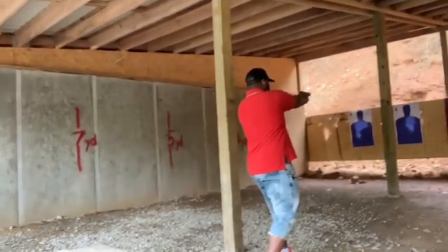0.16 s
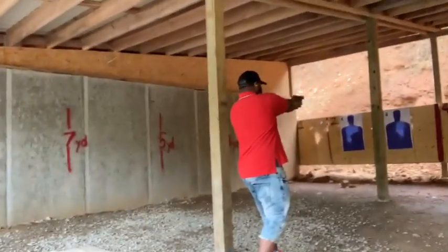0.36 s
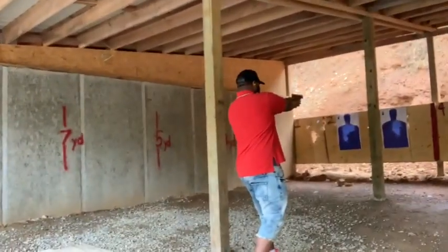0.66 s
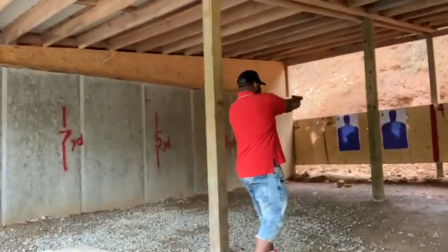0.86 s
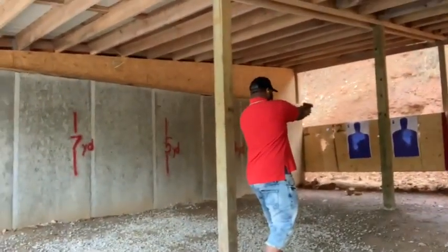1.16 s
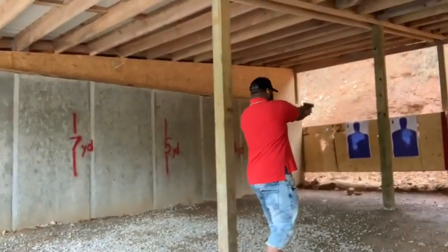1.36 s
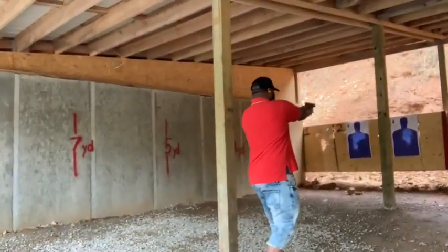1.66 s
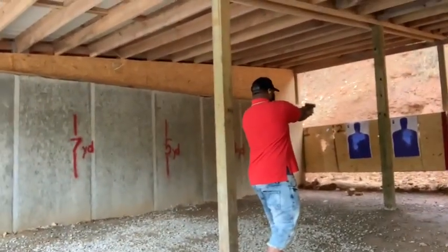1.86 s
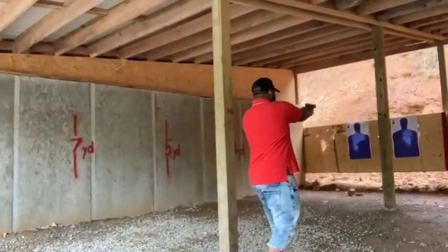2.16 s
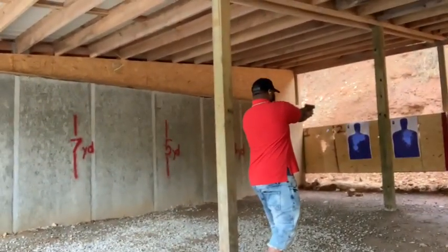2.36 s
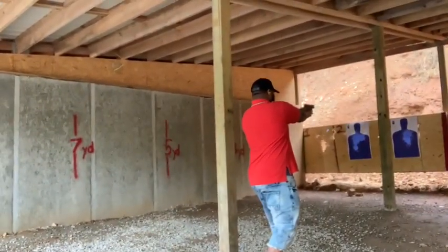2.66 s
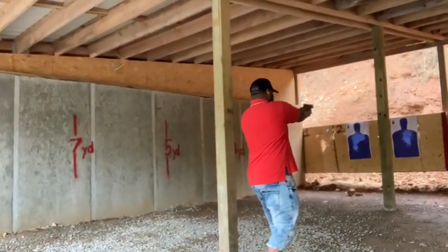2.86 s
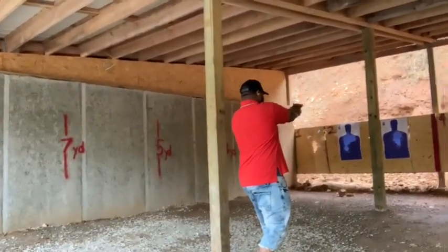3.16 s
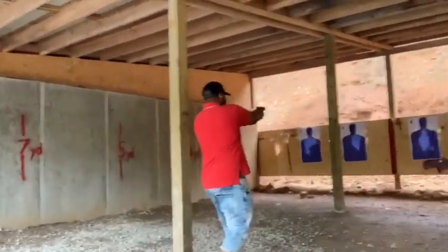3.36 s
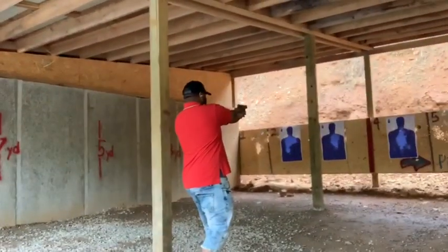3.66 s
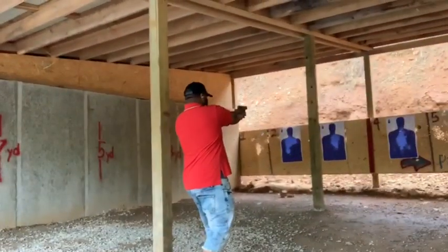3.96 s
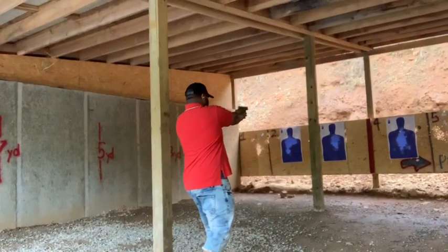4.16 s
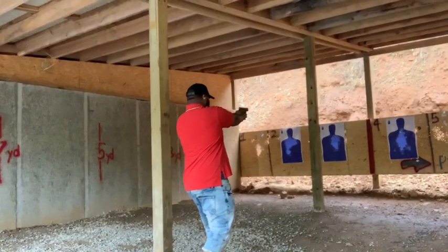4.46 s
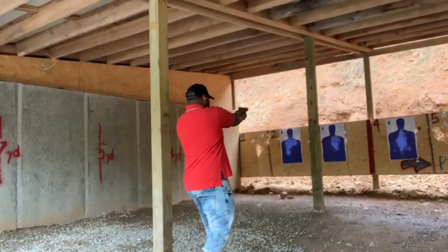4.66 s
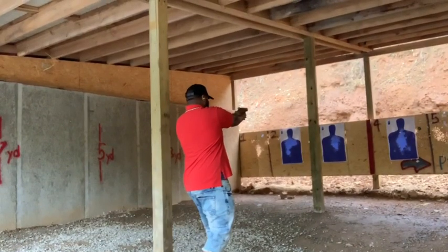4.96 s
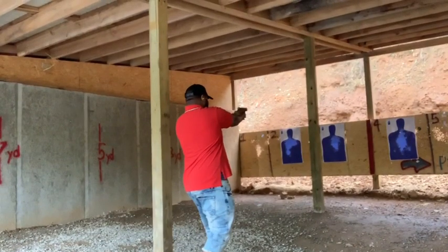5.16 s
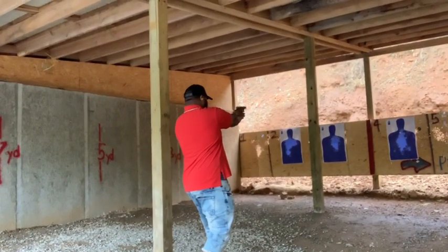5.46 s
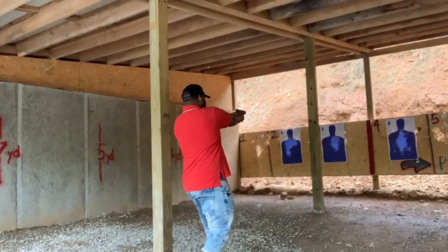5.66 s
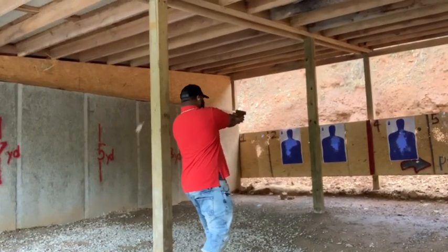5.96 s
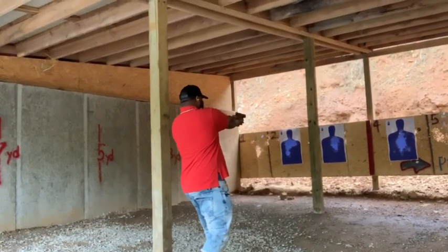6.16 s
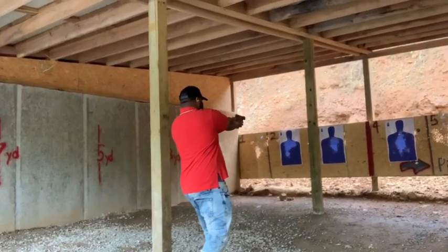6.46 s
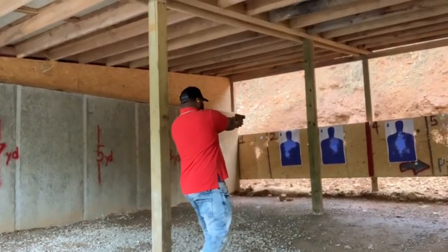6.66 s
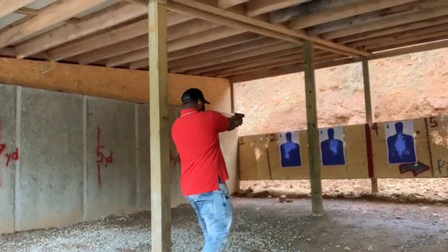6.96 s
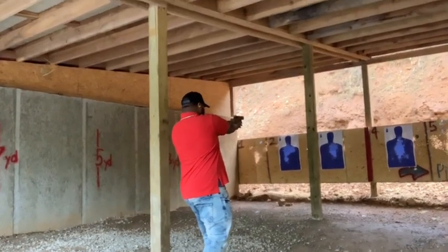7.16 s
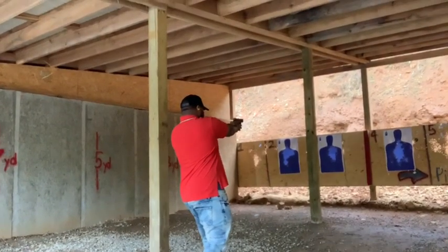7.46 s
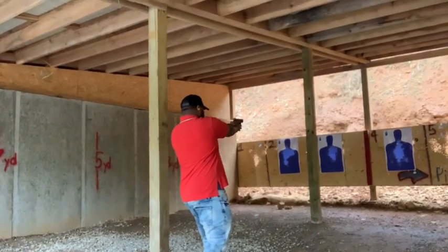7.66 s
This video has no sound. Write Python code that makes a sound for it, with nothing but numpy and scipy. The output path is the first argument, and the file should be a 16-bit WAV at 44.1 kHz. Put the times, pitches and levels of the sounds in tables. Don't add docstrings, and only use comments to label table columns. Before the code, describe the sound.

Spaced single pistol blasts slap off concrete wall and low roof, tails dulling quickly, with faint case pings, wood taps, grit and camera handling thumps.

```python
import sys
import numpy as np
from scipy import signal
from scipy.fft import rfft, irfft
from scipy.io import wavfile
from scipy.ndimage import uniform_filter1d

SR = 44100
rng = np.random.default_rng(int(sys.argv[2]) if len(sys.argv) > 2 else 0)


def inscribe(sig):
    pcm = np.round(np.clip(np.atleast_2d(sig).T, -1, 1) * 32767)
    wavfile.write(sys.argv[1], SR, pcm.astype(np.int16))


def nominal_scale(level):
    x = np.asarray(level, float) / 20
    return 10 ** x


N = 345303
HZ = np.fft.rfftfreq(2048, 1 / SR)
SPLIT_HZ = 8400

# t/s, rise/s, early smear/s, smear level/dB, entry of the top band t/s
SHOTS = [
    (.060, 0.0045, .002, -19.5, .076),
    (3.173, 0.0072, .004, -24, 3.185),
    (5.517, 0.0063, .02, -23, 5.517),
]
# t/s, level/dB
ECHOES = [
    [(0.07, -10), (0.085, -7.5), (0.214, -17.5), (0.25, -24), (0.512, -23), (0.8, -38.5), (1.19, -53),
     (1.74, -65.5), (3.16, -74)],
    [(3.19, -12), (3.408, -11.5), (3.524, -16.5), (3.85, -41.5), (4.25, -58), (4.654, -72), (5.49, -80)],
    [(5.53, -10.5), (5.755, -12.5), (5.78, -16.5), (5.834, -19.5), (6.016, -37.5), (6.25, -51),
     (6.734, -68), (7.83, -93)],
]
# deepest treble sag t/s, sag/dB per octave, extra front brightness/dB per octave, shove on the ports level/dB
HOLDS = [
    (.42, -.9, 3.5, -42),
    (3.57, -1.69, 1, -48),
    (5.88, -1.7, .2, -27),
]
# t/s, peak level/dB, f/Hz, roughness (0-1)
BUMPS = [(0.874, -27.5, 112.1, 0.26), (1.104, -30, 232.5, 0.14), (1.128, -32, 215, 0.2),
         (1.223, -40, 125.8, 0.23), (1.281, -29, 111.3, 0.3), (1.728, -41.5, 91.5, 0.32),
         (1.995, -46.5, 394, 0), (3.095, -57, 150, 0.4), (3.13, -44.5, 93.5, 0.28),
         (6.407, -44.5, 113, 0.35), (7.149, -35, 179, 0.05), (7.24, -56, 89.9, 0.37),
         (7.37, -65, 150, 0.38), (7.53, -63, 70.03, 0.28), (7.68, -60, 70, 0.23), (7.75, -61, 80, 0.29)]


def evened(x):
    return x / np.sqrt(np.mean(x ** 2) + 1e-20)


def read(points, hz, order=1):
    columns = np.transpose(points)
    return np.interp(np.log(hz + 1), np.log(columns[0] + 1), columns[order])


def add(mix, s, sound):
    part = mix[..., round(s * SR):][..., :sound.shape[-1]]
    part += sound[..., :part.shape[-1]]


def panned(x, db):
    return x * nominal_scale(np.array([[db / 2], [-db / 2]]))


def band(x, low_hz, high_hz):
    sections = signal.butter(3, [low_hz, high_hz], "bandpass", fs=SR, output="sos")
    return signal.sosfilt(sections, x)


def band_db(colour_db, low_hz, high_hz):
    inside = (HZ > low_hz) & (HZ < high_hz)
    return 10 * np.log10((nominal_scale(colour_db[inside]) ** 2).sum(0) / len(HZ))


def fading(s, db, t60, grow):
    since = np.arange(-2 * grow, t60, 1 / SR)
    return s - 2 * grow, nominal_scale(db + np.minimum(20 * since / grow, -60 * since / t60))


def taps(size, per_s, spread_db):
    sizes = nominal_scale(spread_db * np.minimum(rng.exponential(1, (size, 2)), 4))
    heights = sizes * rng.choice([-1., 1.], (size, 2))
    struck = rng.random((size, 2)) < per_s / SR
    return evened((heights * struck).T)


def ports(pair, colour_db, likeness=1.):
    # f/Hz, coherence (0-1)
    coherence = [(60, .98), (130, .985), (290, .9), (640, .6), (1400, .55), (3100, .2), (6800, .25),
                 (15000, .6)]
    # f/Hz, level/dB
    side_lean = [(60, 0), (150, -0.5), (380, -1.0), (950, -0.5), (2380, -1.5), (5980, 2.5), (15000, 2)]
    lead_s = .00012
    a, b = signal.stft(pair, nperseg=2048, noverlap=1536)[2]
    same = np.clip(likeness * read(coherence, HZ), -1, 1)[:, None]
    delay = np.exp(-2j * np.pi * HZ * lead_s)[:, None]
    right = (same * a + np.sqrt(1 - same ** 2) * b) * delay
    lean = nominal_scale(read(side_lean, HZ) / 2)[:, None]
    z = np.array([a * lean, right / lean]) * nominal_scale(colour_db)
    return signal.istft(z, nperseg=2048, noverlap=1536)[1][:, :pair.shape[1]]


def yard(x, wet_db, t60=1.0):
    t = np.arange(SR // 2) / SR
    tail = taps(len(t), 2500, 1.5) * nominal_scale(-60 * t / t60) * (t > .004)
    echo = signal.fftconvolve(x, tail / np.linalg.norm(tail[0]), axes=1)[:, :N]
    return x + nominal_scale(wet_db) * echo


def ring(modes, length, tune=0.9966, damping=1., trim_db=0.):
    hz, db, t60 = np.transpose(modes)[:, :, None]
    t = np.arange(round(length * SR)) / SR
    decay = nominal_scale(db + trim_db - 60 * t / (t60 * damping))
    x = (decay * np.sin(2 * np.pi * hz * tune * t)).sum(0)
    return x / abs(x).max()


def quiet_air():
    # f/Hz, level/dB per Hz
    air_spectrum = [(59, -29.5), (100, -3), (135, -4), (197, -9.5), (461, -13.5), (4200, -39),
                    (6990, -44.5), (8460, -40.5), (16000, -56)]
    air = evened(ports(rng.standard_normal((N, 2)).T, read(air_spectrum, HZ)[:, None]))
    opening = np.arange(N) / SR < SHOTS[0][0]
    return air * np.where(opening, nominal_scale(-46), nominal_scale(-79.2))


def lows():
    opening_lows = [
        [-43],
        [-48],
    ]
    roof_hz, roof_width_hz = 116.74, 30
    t, (a, b, c) = np.arange(N) / SR, rng.standard_normal((N, 3)).T
    level_db = opening_lows + 0 * t
    for (at, *_), rows in zip(SHOTS, ECHOES):
        echo_db = np.interp(t, *np.transpose(rows))
        lag_db = -31 * np.exp(-np.maximum(t - at, 0) / .42)
        level_db = np.where(t < at, level_db, [echo_db - 1.5 + lag_db, echo_db - 29])
    rumble = nominal_scale(level_db[1]) + nominal_scale(-77 + 3.9 * evened(band(c, .8, 5.6)))
    for (at, *_), (*_, shove_db) in zip(SHOTS, HOLDS):
        add(rumble, *fading(at + .02, shove_db, .6, .015))
    for s, db, *_ in BUMPS:
        add(rumble, *fading(s + .01, db - 28, .45, .03))
    hum = evened(band(a, roof_hz - roof_width_hz / 2, roof_hz + roof_width_hz / 2))
    return nominal_scale(level_db[0]) * hum + rumble * evened(band(b, 26, 59))


def gravel():
    # f/Hz, level/dB per Hz
    stone_spectrum = [(410, -28), (700, -5.5), (2460, -6), (3070, -5), (7010, -9.5), (8310, -2.5),
                      (11400, -12), (12200, -16.5), (14800, -15), (16000, -21.5)]
    # most weight t/s, level/dB, growth by 20 dB/s, t60/s, lower band against it/dB
    scuffs = [(.93, -74.5, 0.19, .16, 9), (.98, -57.5, .006, .45, -5.5), (1.13, -68.5, -0.01, .44, -2.5),
              (1.312, -73, .011, .6, 1), (1.62, -79.5, .28, .7, -.5), (1.875, -70.5, .14, 1.4, -11.5),
              (2.025, -61.5, .11, 1.35, -11.5), (2.31, -66.5, .018, .8, -2), (2.528, -66.5, .03, .5, -6.5),
              (2.74, -74.5, .025, 1.6, -3.5), (4.454, -62, .0035, .48, -12.5), (4.74, -82, .12, .4, -3.5),
              (4.95, -85.5, .03, .5, -4.5), (5.19, -84.5, .015, .85, -3), (5.29, -77.5, .24, .36, -5.5),
              (6.075, -71.5, .2, .36, -4.5), (6.222, -77, .04, .5, 14.5), (6.44, -79, .06, .9, -4),
              (6.544, -82, 0.18, .8, 4), (7.004, -89, .012, .1, 5), (7.442, -72, .012, .42, -14),
              (7.604, -83.5, 0.1051, 1.5, -7.5)]
    # t/s, peak level/dB, left minus right/dB, lower band against it/dB
    crunches = [(0.9462, -63, 2.0, -1), (0.9858, -42, 4.0, -15), (1.1292, -65, 3.5, 1),
                (1.3088, -52, 1.5, -4), (1.814, -58.5, 6, -4), (1.8676, -47.5, 2.0, -12.5),
                (2.191, -47, 1.5, -11), (2.2553, -56.5, 5.5, -4), (2.3042, -47.5, 6, -23.5),
                (2.5211, -48, 1, -15), (2.7338, -63.5, 4, -13), (2.7896, -49.5, 3.0, 3.5),
                (2.9262, -57, -1.5, -3), (3.1215, -63, -0.5, -6), (4.462, -53, 8.5, -14.5),
                (4.7194, -64, 3.5, -6), (5.1818, -62, -1, -8), (5.257, -64, -1, -10), (6.0454, -55, 1, -5),
                (6.215, -52, -1.5, 8.5), (6.3697, -60.5, 3, -4), (6.4294, -65.5, 17, -4.5),
                (6.5326, -62.5, 3, -6), (7.002, -64, 5.5, -1), (7.1541, -60, 0, -7), (7.1793, -64, -7, -8),
                (7.4382, -55, 10, -13), (7.5971, -62.5, 2.5, -18), (7.7094, -68, 11, -7.5),
                (7.7994, -69.5, 11.5, -7.5)]
    after = np.arange(SR // 3) / SR
    upper, lower = np.zeros((2, 2, N))
    for s, db, grow, t60, lower_db in scuffs:
        add(upper, *fading(s, db + 2.5, t60, grow))
        add(lower, *fading(s, db + 8.5 + lower_db, t60, grow))
    for s, db, pan_db, lower_db in crunches:
        settling = nominal_scale(db - 15.5 - 60 * after / 0.13)
        snap = nominal_scale(db - 11 - 60 * after / 0.0085)
        weight = panned(settling + snap, pan_db)
        add(upper, s, weight)
        add(lower, s, nominal_scale(lower_db) * weight)
    colour_db = read(stone_spectrum, HZ)
    stones = ports(taps(N, 6000, 3.0), (colour_db - band_db(colour_db, 5000, 11000))[:, None])
    bright = band(stones, 4300, 11300) + nominal_scale(6.2) * band(stones, 11300, 17000)
    return upper * bright + lower * band(stones, 500, 3700)


def bumps():
    # t/s, peak level/dB, f/Hz, t60/s, roughness (0-1)
    presses = [
        (.001, -29.5, 188, 0.224, 0),
        (1.966, -54.5, 342, 0.81, 0.55),
        (2.545, -57, 200, 0.45, 0.52),
        (7.19, -62, 168, 0.544, 0.52),
    ]
    out, t = np.zeros((2, N)), np.arange(SR // 2) / SR
    touches = [*presses, *[(s, db, hz, .065, rough) for s, db, hz, rough in BUMPS]]
    skins = rng.standard_normal((len(touches), len(t)))
    onset = 1 - np.exp(-t / 0.00263)
    for (s, db, hz, t60, rough), skin in zip(touches, skins):
        tone = np.sin(2 * np.pi * hz * t)
        body = (1 - rough) * tone + rough * evened(band(skin, 0.47 * hz, 2.2 * hz))
        add(out, s, nominal_scale(db + 3 - 60 * t / t60) * body * onset)
    return out


def knocks():
    # t/s, peak level/dB, strongest mode f/Hz, its t60/s, centre of the clack f/Hz
    touches = [(2.523, -42.5, 1471, 0.044, 1434), (2.544, -40, 452, 0.0574, 1344),
               (2.558, -51.5, 730, 0.136, 1760), (2.645, -52.5, 440, 0.029, 1460),
               (2.799, -57.5, 1110, 0.095, 1110), (6.218, -31, 660, 0.09, 1140),
               (6.53, -41.5, 980, 0.049, 1780), (6.659, -40.5, 997, 0.0344, 1260),
               (6.737, -45.5, 534, 0.0484, 1260), (6.795, -49.5, 1017, 0.037, 1100),
               (6.837, -53.5, 1327, 0.049, 1330), (6.949, -63.5, 428.3, 0.06, 1911),
               (7.004, -51, 1291, 0.069, 1300)]
    out, draws = np.zeros((2, N)), rng.random((len(touches), 40, 2))
    onset = 1 - np.exp(-np.arange(SR // 5) / SR / 0.00125)
    for (s, db, hz, t60, clack_hz), (place, size) in zip(touches, draws.transpose(0, 2, 1)):
        brief_hz = 450 * 14.0 ** place
        brief_db = -7 - 9 * size - 8.5 * abs(np.log2(brief_hz / clack_hz))
        signed_hz = brief_hz * np.sign(size - .5)
        crowd = ring(list(zip(signed_hz, brief_db, np.full(40, .03))), .2)
        strong = ring([(hz, 0, t60)], .2)
        add(out, s, panned(nominal_scale(db) * onset * (0.527 * strong + 1.06 * crowd), -1.2))
    return yard(out, -2.6, t60=0.34)


def cases():
    # f/Hz, level/dB, t60/s
    brass_modes = [(6150, -24, .2), (7450, -5, .5), (8230, -18, .08), (8570, -6, .45), (8650, 0, .24),
                   (13900, -5, .2)]
    # t/s, peak level/dB, main ring f/Hz, damping (factor on t60), side modes level/dB
    landings = [
        (0.9844, -50, 8562, 1.2, -16),
        (1.1358, -62, 8555, 0.876, -18),
        (4.464, -42, 8650, 0.985, -10),
        (6.2169, -75.5, 8536, 0.9, -8),
        (6.5326, -52.5, 8660, 1.0, -26),
        (7.002, -83.5, 8610, 0.75, -9),
        (7.439, -51.5, 8600, 0.996, -24.5),
        (7.5971, -60, 8600, 0.9, -10.5),
        (7.7098, -74.5, 8560, 0.864, -7),
        (7.7877, -75.5, 8579, 0.82, -10.5),
    ]
    out = np.zeros((2, N))
    main_hz = brass_modes[4][0]
    for s, db, hz, damping, side_db in landings:
        near_main = abs(np.array(brass_modes)[:, :1] / main_hz - 1) < .03
        trim_db = np.where(near_main, 0, side_db)
        add(out, s, panned(nominal_scale(db) * ring(brass_modes, .6, hz / main_hz, damping, trim_db), 2.5))
    return yard(out, -8, t60=.25)


def echo_colour(at, age, hold):
    # f/Hz, level/dB per Hz
    muzzle_spectrum = [(15, -35), (25, -15), (236, -8.5), (476, -4), (734, -4.5), (818, -2), (1130, -7),
                       (1330, -11), (1480, -11), (2280, -14), (10100, -21.5), (11300, -23.5),
                       (14800, -28.5), (16000, -42.5)]
    # f/Hz, most loss against the middle band/dB, time to lose it/s
    dulling = [(60.5, 22.5, 0.24), (122, 7, 0.25), (195, -6.5, 1.8), (347, -2.5, 0.5), (660, 4.5, 1.4),
               (1100, 5, .9), (1539, 5, 0.2), (3220, 12, 0.38), (6240, 28, .5), (10100, 41.5, 0.64),
               (15000, 49.5, 0.56), (15900, 59.5, .25)]
    # f/Hz, width/Hz, level/dB
    shed_modes = [(436.94, 12, 4), (683.6, 40, 5), (806, 15, 4.5), (1100, 20, 4), (3300, 1000, 1),
                  (8100, 360, 3)]
    free_at, sag_db, front_db, _ = hold
    loss_db = read(dulling, HZ)[:, None] * np.tanh(age / read(dulling, HZ, order=2)[:, None])
    modes_db = sum(db / (1 + (2 * (HZ - hz) / width) ** 2) for hz, width, db in shed_modes)
    held_db, far_db = -0.4576, 1.29
    free = np.maximum(at + age - free_at, -1)
    bright_db = held_db + front_db * np.exp(-age / 0.013) + sag_db * np.exp(-(free / .13) ** 2)
    bright_db = bright_db + (far_db - held_db) * np.tanh((np.maximum(free, 0) / .45) ** 2)
    tilt_db = np.outer(np.log2(np.maximum(HZ / 1200, 1)), bright_db)
    growth_db = np.outer(modes_db, np.tanh((age + 0.04) / 0.16))
    colour_db = read(muzzle_spectrum, HZ)[:, None] + growth_db - loss_db + tilt_db
    patches = uniform_filter1d(rng.standard_normal(colour_db.shape[::-1]), size=5, axis=0)
    patches = uniform_filter1d(patches, size=6, axis=1)
    colour_db = colour_db + 2.2 * evened(patches).T
    return colour_db - band_db(colour_db, 300, 1500)


def shot(blast, rows, hold):
    at, rise, smear, smear_db, top_at = blast
    s, level_db = np.transpose(rows)
    t = np.arange(at - smear, s[-1] + .01, 1 / SR)
    frames = np.arange(-(-len(t) // 512) + 1)
    age = np.maximum(frames * 512 / SR - smear, 0)
    colour_db = echo_colour(at, age, hold)
    grains = taps(len(t), 4000, 1.6)
    top = (HZ > SPLIT_HZ)[:, None]
    lower = ports(grains, colour_db - 99 * top)
    upper = ports(grains, colour_db + 1.0 - 99 * ~top)
    front = np.clip((t - at) / rise, 0, 1) ** 2
    early = nominal_scale(smear_db + 9 * np.minimum(t - at, 0) / smear) * (1 - front)
    late = np.clip((t - top_at) / .003, 0, 1)
    late = late * (1 + 0.5 * np.exp(-abs(t - top_at) / 0.018))
    return t[0], nominal_scale(np.interp(t, s, level_db)) * ((front + early) * lower + late * upper)


def scene():
    mix = quiet_air()
    for row in zip(SHOTS, ECHOES, HOLDS):
        add(mix, *shot(*row))
    return mix + lows() + gravel() + cases() + knocks() + bumps()


def roll_off(x):
    return signal.sosfilt(signal.butter(12, 16390, fs=SR, output="sos"), x)


def record(dry):
    # f/Hz, width/Hz, level/dB
    seams = [(11254, 810, -30.5), (13520, 600, -26)]
    hz, t = np.fft.rfftfreq(N, 1 / SR), np.arange(N) / SR
    held = rfft(.95 * np.tanh(dry / .95)) / (1 + (hz / 16000) ** 90)
    seams_db = sum(db * np.exp(-abs(2 * (hz - centre_hz) / width) ** 4) for centre_hz, width, db in seams)
    fresh = sum(np.exp(-(abs(t - at) / 0.017) ** 4) for *_, at in SHOTS)
    x = fresh * irfft(held, N) + (1 - fresh) * irfft(held * nominal_scale(seams_db), N)
    shut = sum((t > at - smear - .005) & (t < top_at) for at, _, smear, _, top_at in SHOTS)
    top_band = irfft(rfft(x) * (hz > SPLIT_HZ), N)
    x = x - uniform_filter1d(shut * 1., size=60) * top_band
    return roll_off(x)


dry = scene()
out = record(dry)
inscribe(out)
```